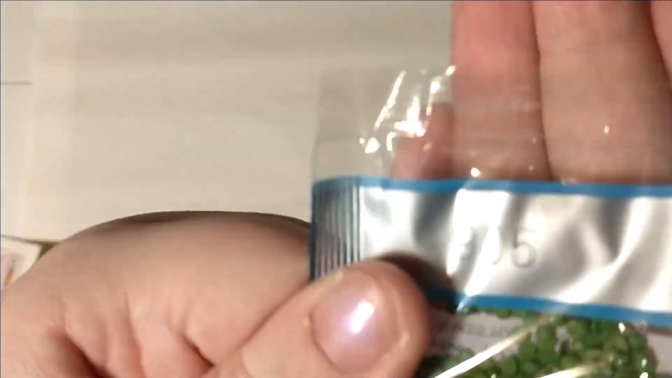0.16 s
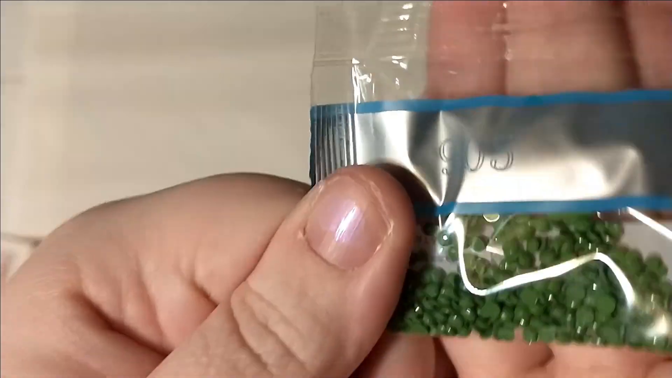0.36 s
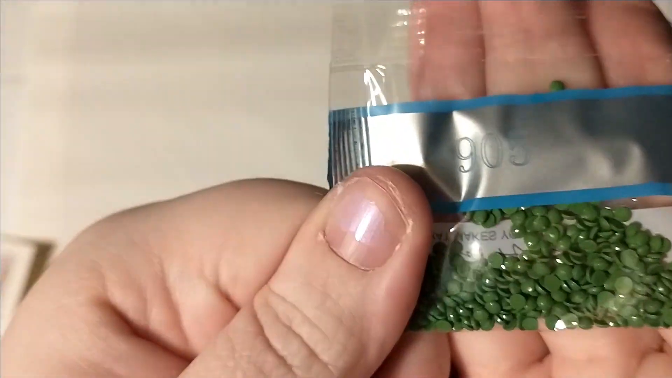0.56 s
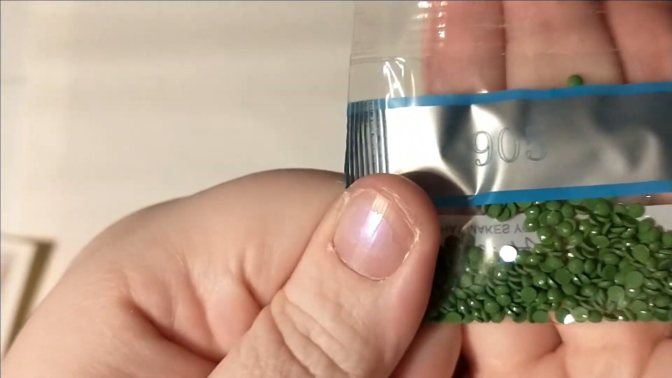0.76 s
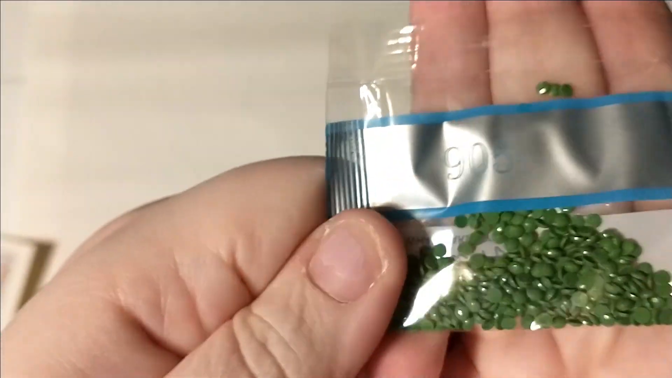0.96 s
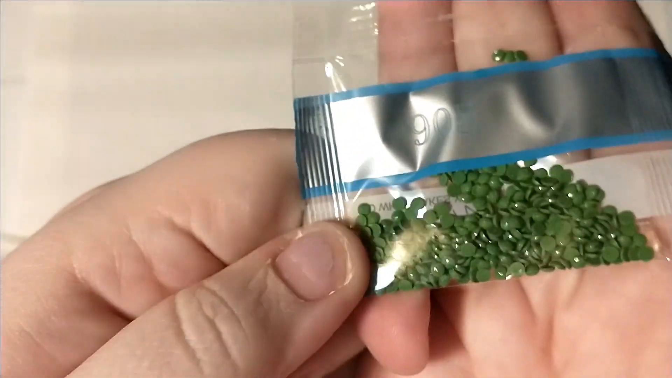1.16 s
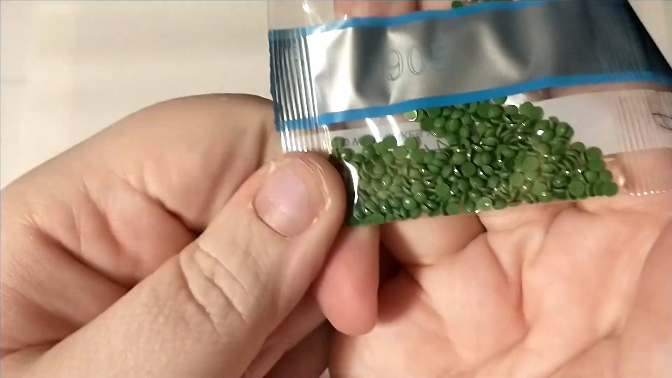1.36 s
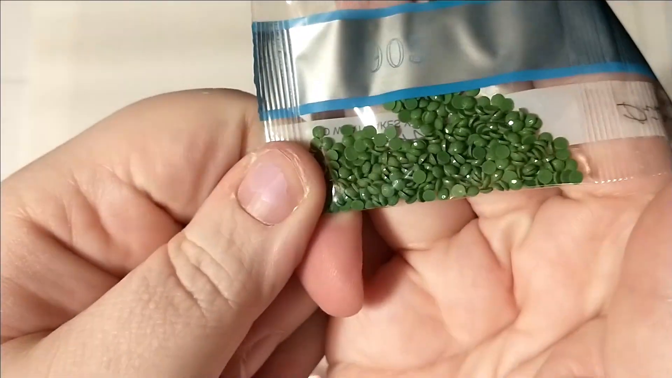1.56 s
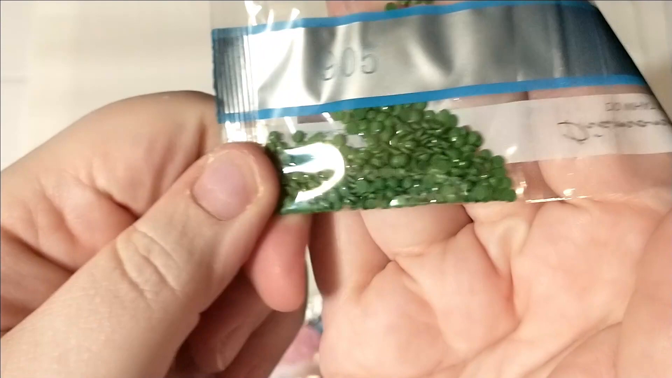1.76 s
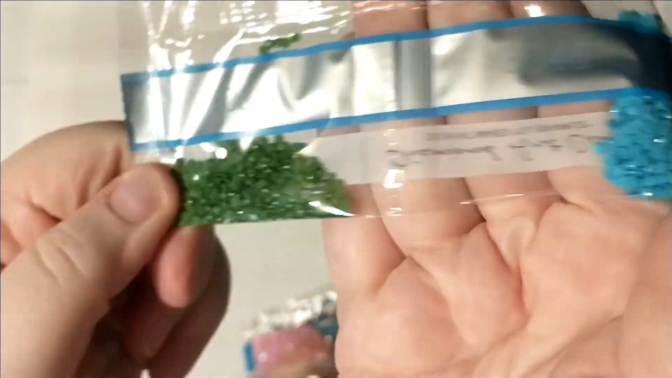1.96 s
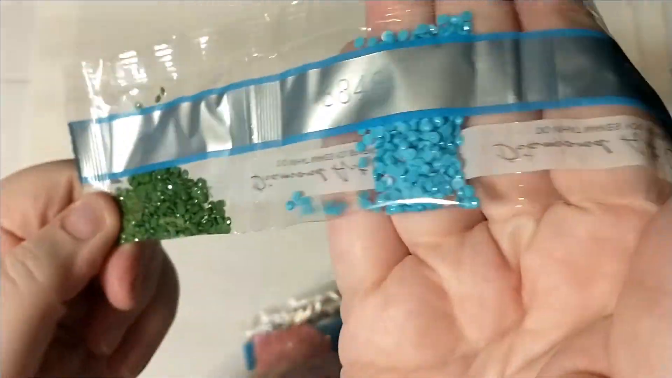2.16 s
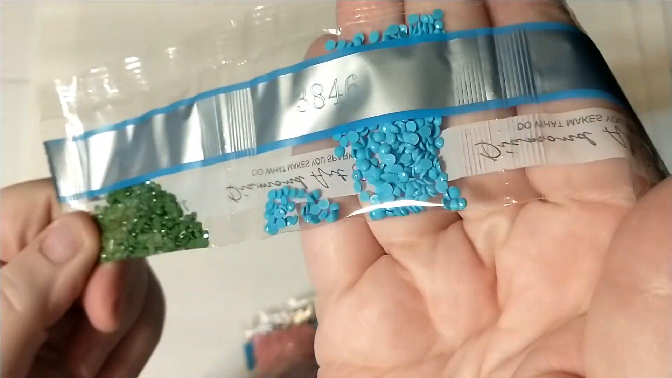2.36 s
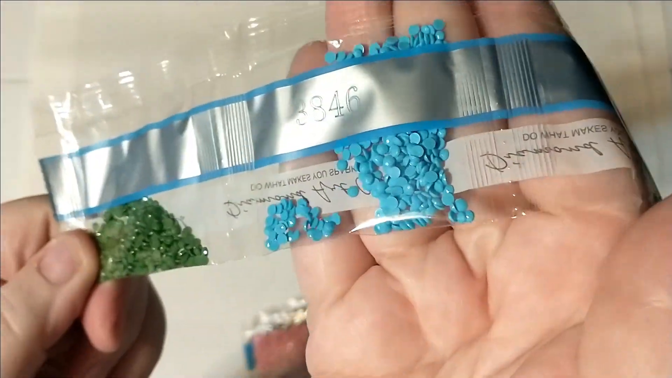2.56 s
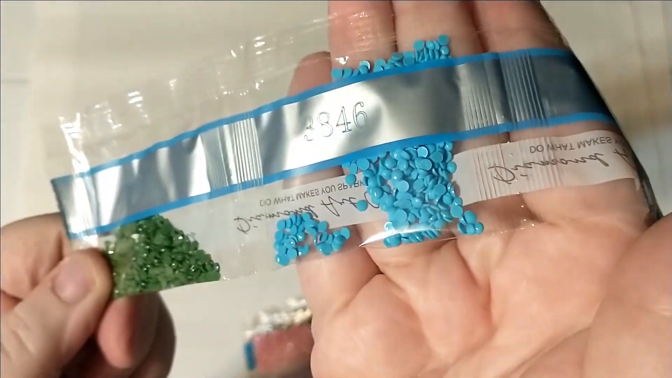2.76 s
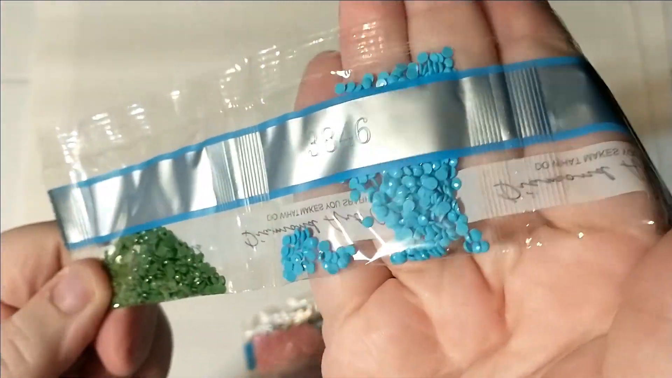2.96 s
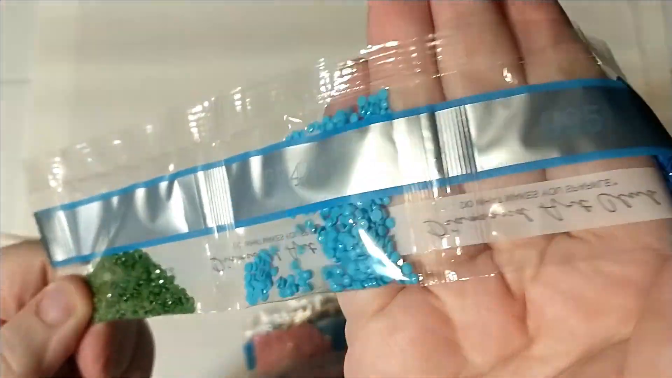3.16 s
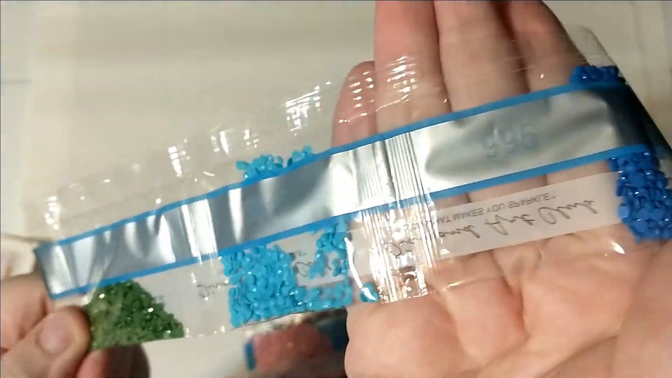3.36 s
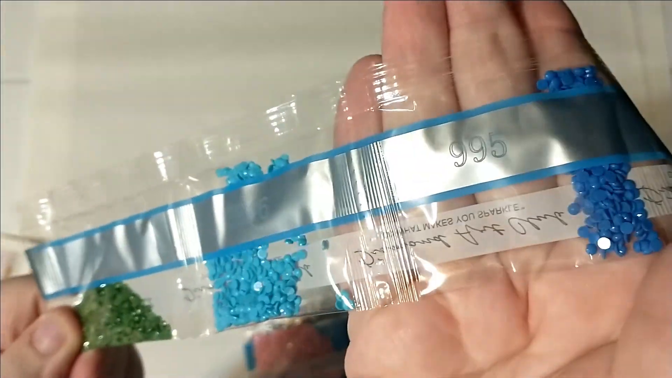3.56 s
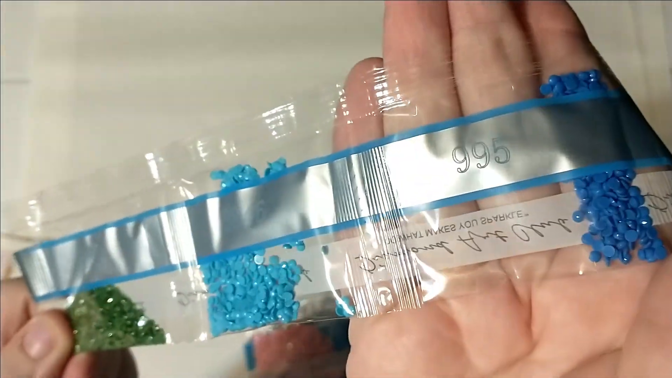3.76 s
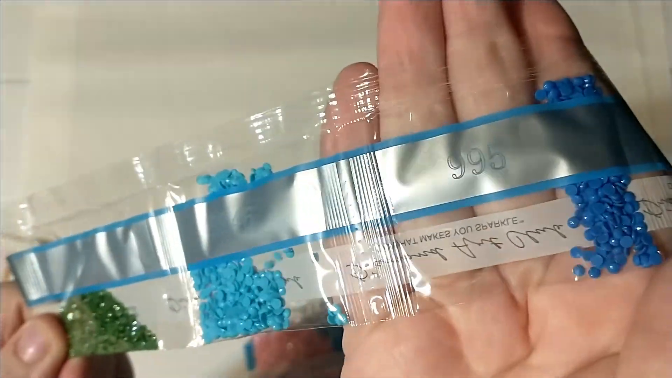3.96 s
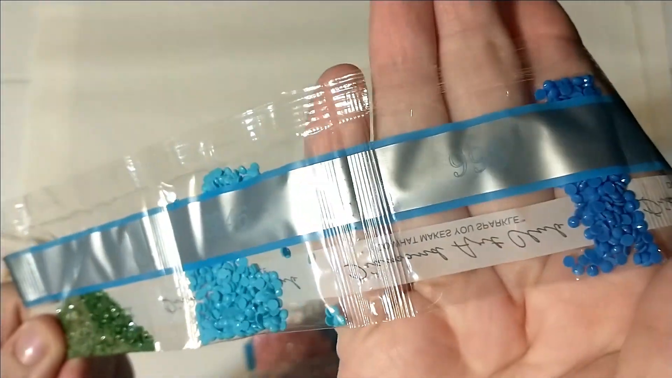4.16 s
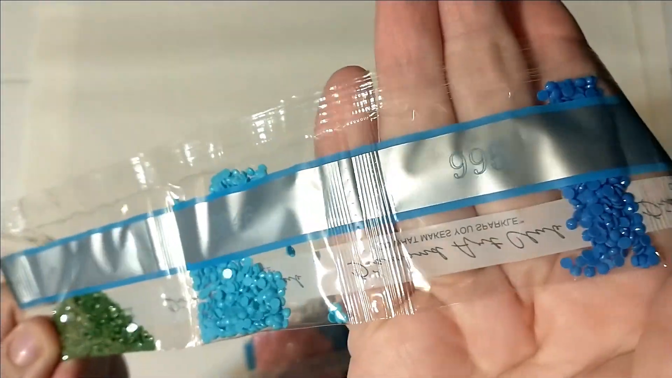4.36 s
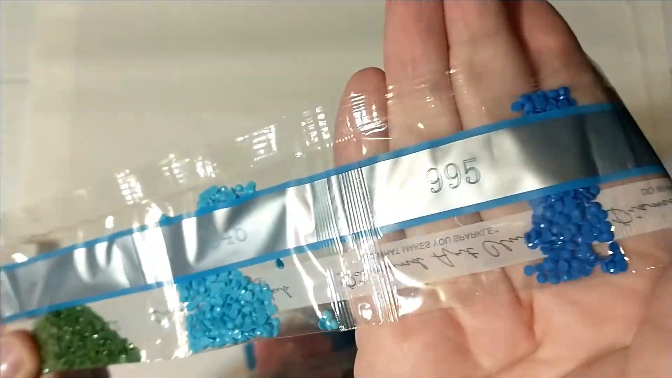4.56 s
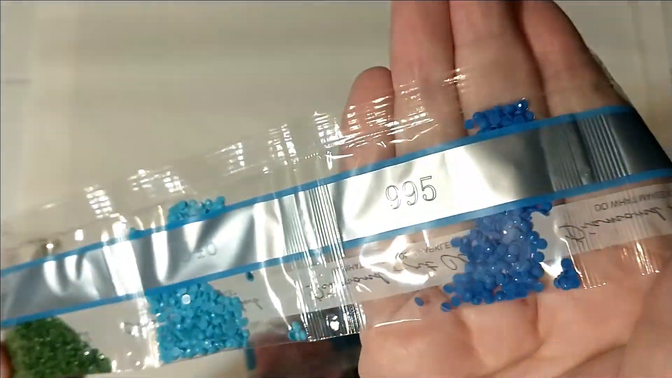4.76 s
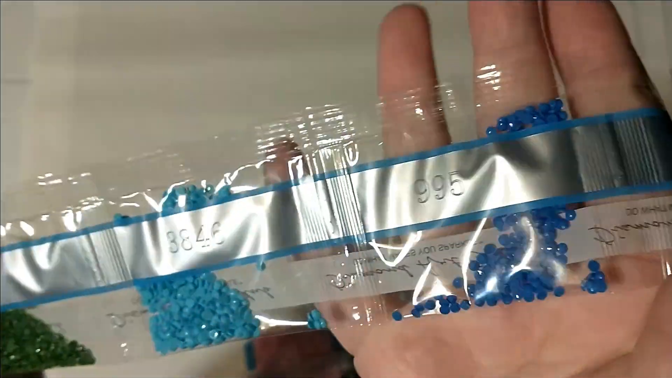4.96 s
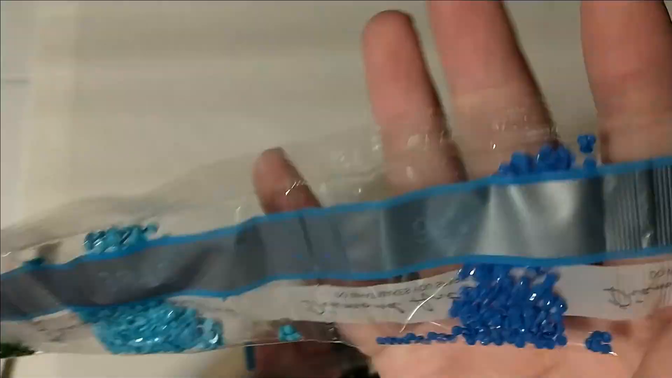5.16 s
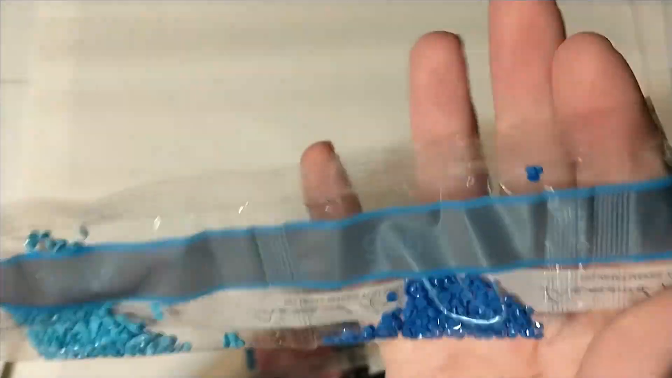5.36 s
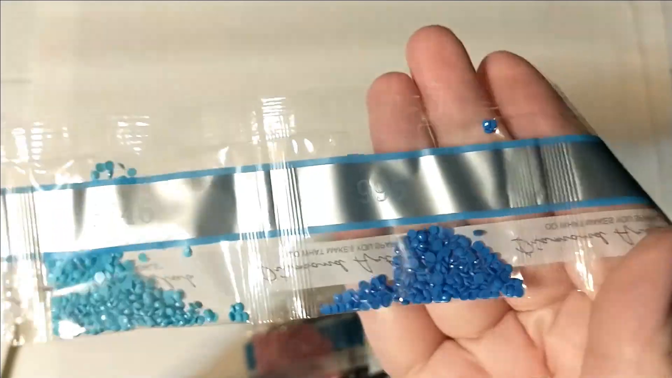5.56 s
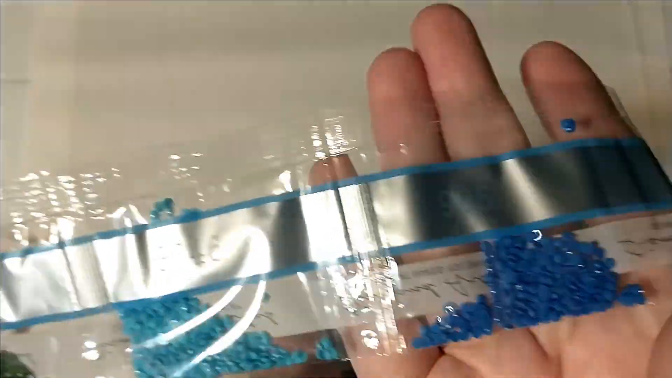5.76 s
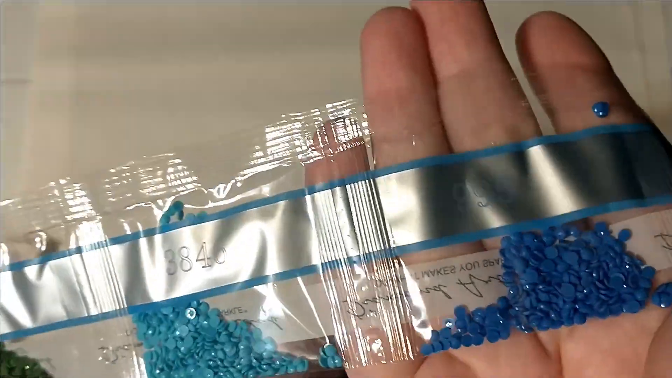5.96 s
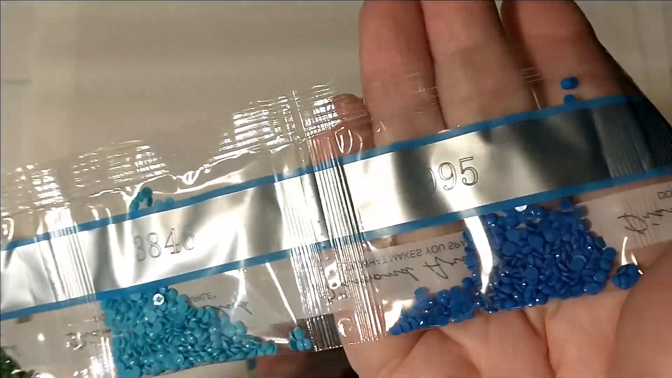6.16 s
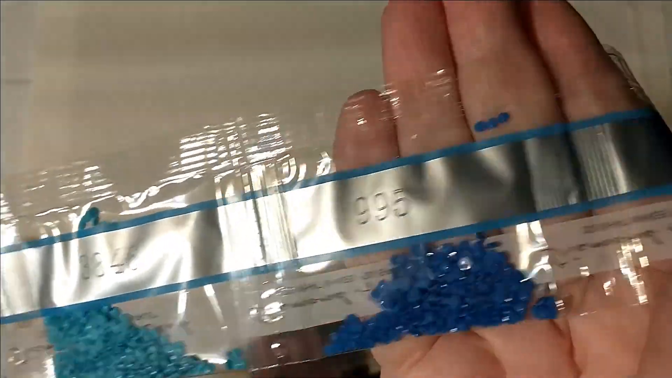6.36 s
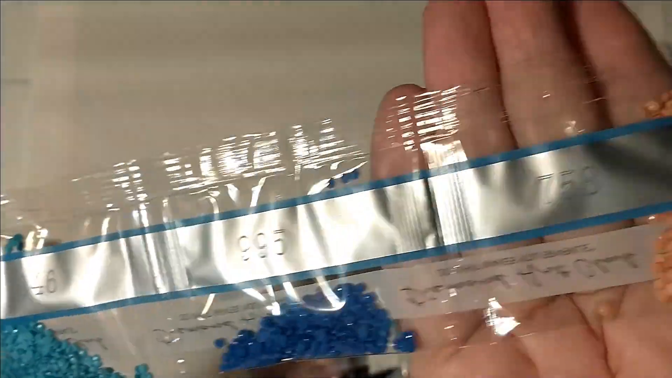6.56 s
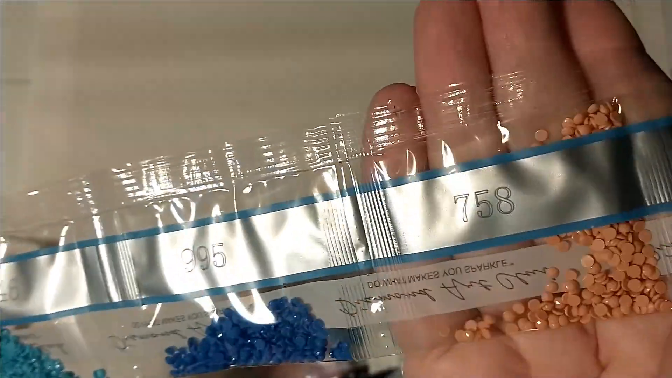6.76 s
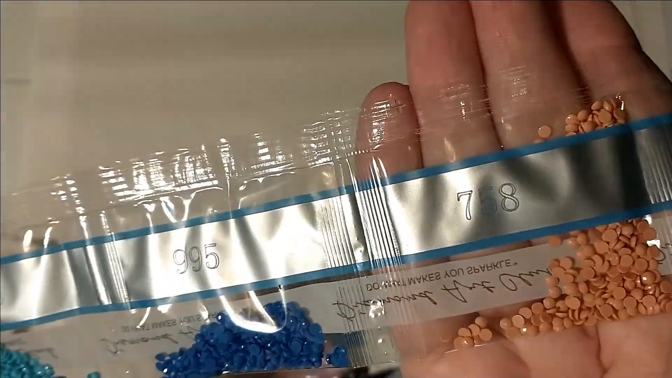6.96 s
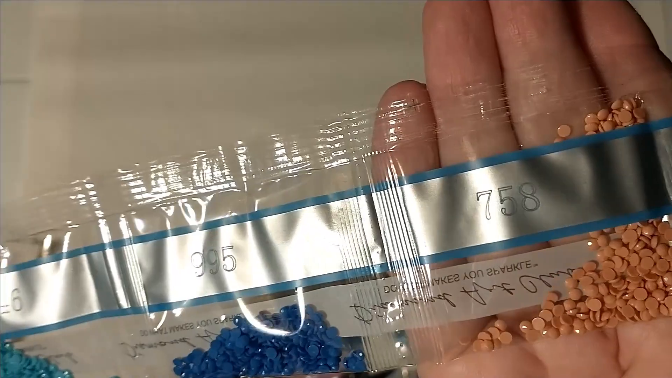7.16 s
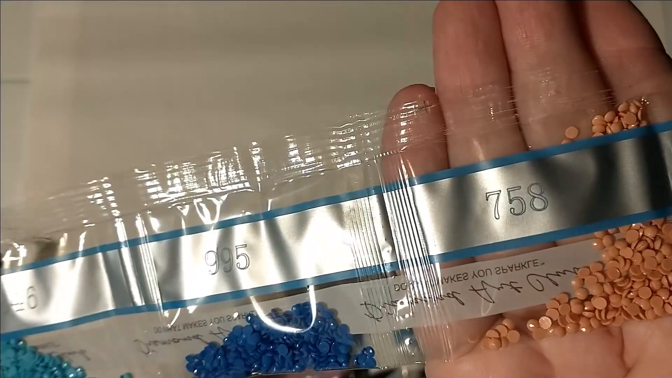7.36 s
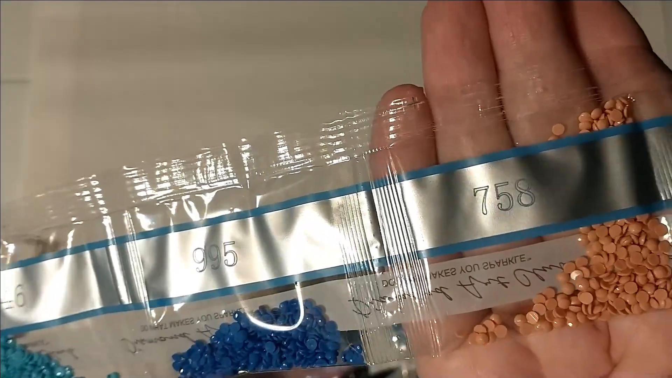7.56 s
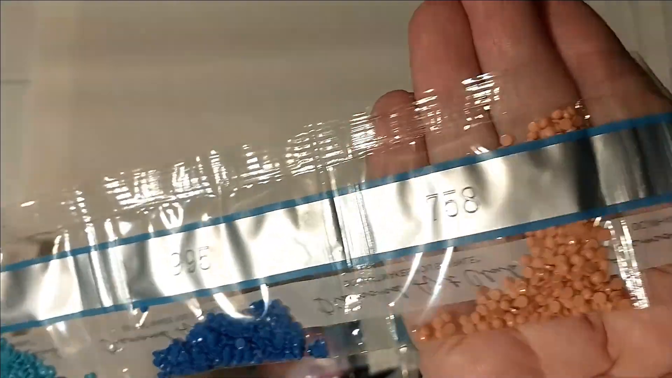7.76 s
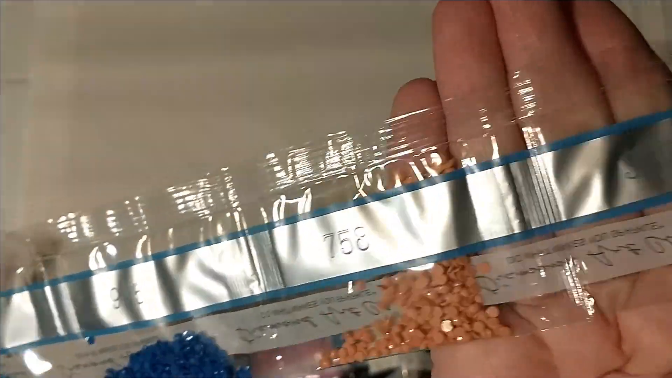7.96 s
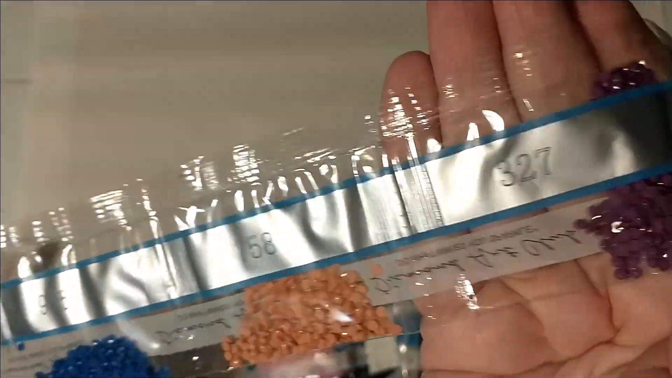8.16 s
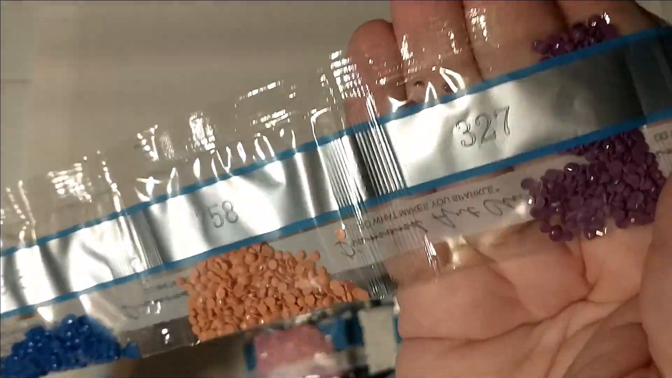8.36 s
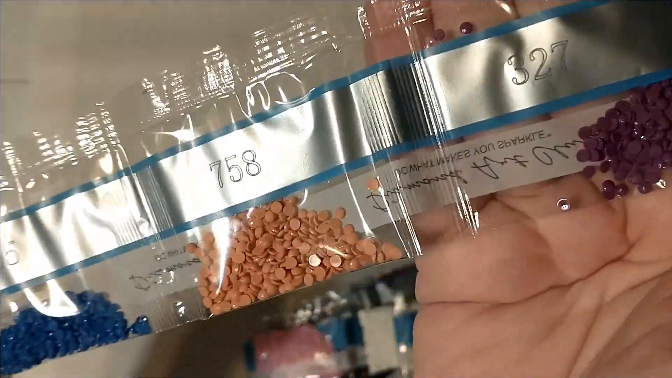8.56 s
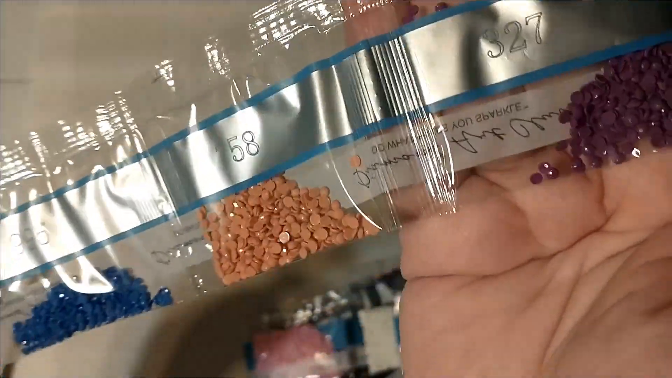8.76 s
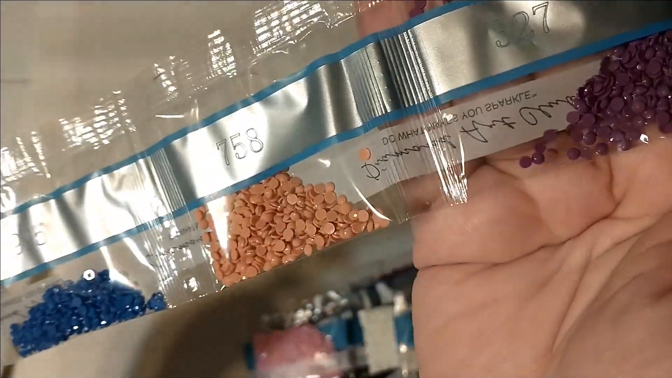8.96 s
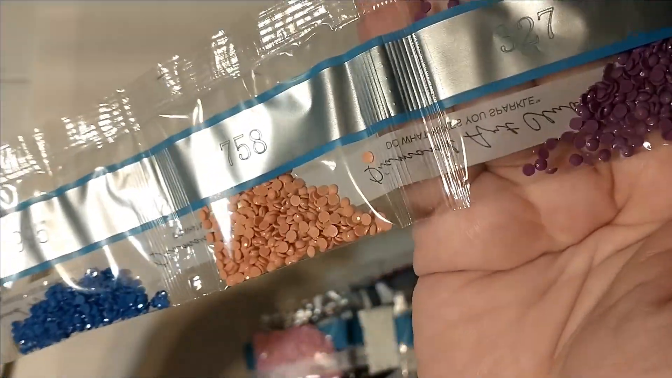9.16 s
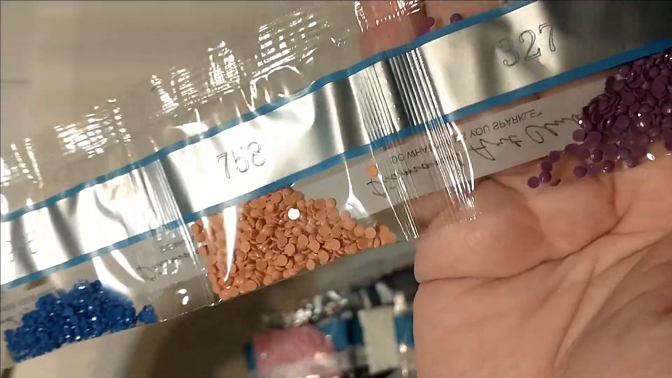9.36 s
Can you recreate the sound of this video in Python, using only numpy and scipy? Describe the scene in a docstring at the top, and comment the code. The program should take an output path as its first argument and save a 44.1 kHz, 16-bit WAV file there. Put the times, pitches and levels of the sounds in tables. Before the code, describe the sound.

Thin crisp plastic film crackles in irregular bursts as fingers pull and bend it: dense snapping at first, scattered ticks, then repeated firmer flurries separated by lulls. Tiny beads and film slide with a fine dry hiss, and skin brushes or bumps it softly. Close stereo pickup in a small quiet room with low air noise, a faint hum and a brief barely audible thin whine midway.

```python
"""Creases snap in a strip of small plastic bags of tiny beads, fed through the hands close to the microphone.
Each snap crosses the film as a bending wave, treble first, so it is heard as a very short falling chirp.
Each move of the hands swells and fades: film and beads slide over the palm, fine wrinkles crackle,
and a firm grip sets off lesser snaps at random. Brief scuffs and dull bumps join in.
The small room echoes densely and hums faintly; a thin whine comes and goes."""
import sys
import numpy as np
from scipy import signal
from scipy.fft import rfft, irfft, next_fast_len
from scipy.io import wavfile

SR = 44100
rng = np.random.default_rng(int(sys.argv[2]) if len(sys.argv) > 2 else 0)


def bounce(signal):
    """Save signal as a 16-bit WAV file at the path given by the first command-line argument."""
    frames = np.transpose(np.atleast_2d(signal))
    limited = np.clip(frames, -1, 1)
    pcm = np.round(limited * 32767).astype(np.int16)
    wavfile.write(sys.argv[1], SR, pcm)


N = 414981   # samples in the scene
GRAIN_SIZE, LEAD = 1024, 220   # samples in one snap; samples ahead of its centre


def from_db(db):
    """Turn dB into an amplitude factor."""
    return 10 ** (np.asarray(db) / 20)


def rms_one(x):
    """Scale x to an rms of 1."""
    return x / np.sqrt(np.mean(x ** 2) + 1e-20)


def seconds():
    """Time of every sample of the scene."""
    return np.arange(N) / SR


def at_hz(points, hz):
    """Read a (frequency, value) table on a log-frequency axis."""
    points = np.array(points)
    return np.interp(np.log(hz + 1), np.log(points[:, 0]), points[:, 1])


def filtered(x, response):
    """Pass x through a response given as a function of Hz."""
    size = next_fast_len(N + SR // 2)
    f = np.fft.rfftfreq(size, 1 / SR) + 1e-3
    return irfft(rfft(x, size) * response(f), size)[..., :N]


def resonance(f, hz, q):
    """Complex response of one resonance, 1 on top."""
    return 1 / (1 + 1j * q * (f / hz - hz / f))


def add(track, grain, s):
    """Lay a stereo grain into a track with its centre at s seconds."""
    start = int(s * SR) - LEAD
    a, b = max(start, 0), min(start + GRAIN_SIZE, N)
    track[:, a:b] += grain[:, a - start:b - start]


# colour of the still air in the room: (frequency [Hz], relative density [dB per Hz])
AIR_COLOUR = [(15, -45), (25, -9.5), (49, -18.5), (108, -1.5), (175, -7.5), (317, -9), (384, -12),
              (560, -16.5), (624, -26.5), (3620, -24.5), (9320, -34.5), (10100, -33), (16000, -42)]
# left-right likeness of that air: (frequency [Hz], coherence [0 to 1])
AIR_COHERENCE = [(30, 0.42), (100, 0.77), (500, 0.58), (2000, .25), (8000, .05)]
# hum tones in the room: (frequency [Hz], rms level [dB])
HUM_TONES = [(121, -73), (301, -74.5), (328, -76)]
AIR_DB = -63   # rms of the air without the hum


def air():
    """Quiet room noise, more alike at both ports in the bass, with a hum whose phase wavers slightly."""
    def shape(sign):
        return lambda f: (from_db(at_hz(AIR_COLOUR, f))
                          * np.sqrt(1 + sign * np.clip(at_hz(AIR_COHERENCE, f), 0, 1)))
    mid = filtered(rng.standard_normal(N), shape(1))
    side = filtered(rng.standard_normal(N), shape(-1))
    hum = 0
    for hz, db in HUM_TONES:
        waver = 0.022 * np.cumsum(rng.standard_normal(N))   # radians
        hum = hum + from_db(db) * np.sqrt(2) * np.sin(2 * np.pi * hz * seconds() + waver)
    return from_db(AIR_DB) * rms_one(np.array([mid + side, mid - side])) + hum


# faint thin whine: (frequency [Hz], width [Hz], rms level before the fades [dB])
WHINE_LINES = [(1560, 121, -74), (6900, 460, -69), (10400, 1200, -74)]
WHINE_FROM_S, WHINE_TO_S = 3.6, 4.6


def whine():
    """A few narrow, breathy lines of filtered noise that fade in and out."""
    t = seconds()
    fade = np.clip(np.minimum(t - WHINE_FROM_S, WHINE_TO_S - t) * 10, 0, 1)   # over 0.1 s
    noise = rng.standard_normal((2, N))
    lines = 0
    for hz, width, db in WHINE_LINES:
        line = signal.lfilter(*signal.iirpeak(hz, hz / width, fs=SR), noise)
        lines = lines + from_db(db) * rms_one(line)
    return fade * lines


def shared(response, alike_hz=900):
    """Long waves reach both ports alike, short ones differently."""
    left, right = rfft(response)
    alike = 1 / (1 + (np.fft.rfftfreq(response.shape[1], 1 / SR) / alike_hz) ** 2)
    return irfft(np.array([left, alike * left + np.sqrt(1 - alike ** 2) * right]))


# room echo per band: (centre [Hz], relative level [dB], t60 of the late decay [s])
ROOM_BANDS = [(300, -12, 0.43), (1000, -12.5, 0.26), (3500, -9.5, 0.24), (6760, -9.5, 0.11),
              (14000, -10.5, 0.15)]


def room(x, build_s=0.011, early=0.57, early_s=0.021):
    """Dense echoes from desk and walls, dying band by band, different at each port."""
    t = np.arange(SR // 2) / SR
    f = np.fft.rfftfreq(len(t), 1 / SR)
    white = rfft(rng.standard_normal((2, len(t))))
    centres = np.log([hz for hz, db, t60 in ROOM_BANDS])
    build = 1 - np.exp(-(t / build_s) ** 2)
    early_boost = 1 + early * np.exp(-t / early_s)
    response = 0
    for share, (hz, db, t60) in zip(np.eye(len(ROOM_BANDS)), ROOM_BANDS):
        decay = build * from_db(-60 * t / t60) * early_boost
        band = irfft(white * np.interp(np.log(f + 1), centres, share), len(t))
        response = response + from_db(db) * band * decay / np.sqrt(np.sum(decay ** 2))
    sent = (x + x[::-1] / 2) / 1.39   # each side also feeds the other
    return signal.fftconvolve(sent, shared(response), axes=1)[:, :N]


# hollow of the cupped hand and the desk below: (frequency [Hz], width [Hz], boost of this tone alone [dB])
HOLLOW_TONES = [(654, 100, 5), (730, 37, 2), (1019, 40, 4)]


def hollow(x, trim_db=0.44):
    """Hand and desk lift a few low tones."""
    def response(f):
        return 1 + sum((from_db(db) - 1) * resonance(f, hz, hz / width) for hz, width, db in HOLLOW_TONES)
    return from_db(trim_db) * filtered(x, response)


# fingers bumping the strip against the palm: (time [s], level at the start of the decay [dB])
PALM_BUMPS = [(0.013, -50), (0.281, -39.5), (0.455, -55), (1.948, -50), (2.165, -42), (2.272, -52),
              (5.22, -56), (5.55, -61), (6.037, -48), (6.433, -48), (8.232, -43)]


def bumps(thud_hz=190, q=0.29, t60=0.16, onset_s=0.0017):
    """Soft flesh gives a short dull thud, alike at both ports."""
    t = seconds()
    push = sum(from_db(db - 60 * np.maximum(t - s, 0) / t60) * np.clip((t - s) / onset_s, 0, 1)
               for s, db in PALM_BUMPS)
    return push * rms_one(filtered(rng.standard_normal(N), lambda f: resonance(f, thud_hz, q) ** 2))


# film scuffing briefly over skin: (time of the middle [s], half length to 1/e [s], peak level [dB])
SKIN_SCUFFS = [(0.313, 0.053, -27), (2.653, 0.037, -50.5), (5.378, 0.021, -29.5), (7.434, 0.005, -33.5),
               (7.448, 0.013, -47)]


def scuffs(film_hz=4200, q=1.0, slips_per_s=3000):
    """Very dense slips ring the film for a moment."""
    t = seconds()
    stroke = sum(from_db(db) * np.exp(-((t - s) / half) ** 2) for s, half, db in SKIN_SCUFFS)
    slips = (rng.random(N) < slips_per_s / SR) * (1 + rng.standard_normal((2, N)))
    return stroke * rms_one(filtered(slips, lambda f: resonance(f, film_hz, q) * resonance(f, film_hz, q / 4)))


# moves of the hands, each swelling, holding and dying away, levels before the band trims of the rustle:
# (full strength at [s], rustle [dB], rise [s], hold [s], fall [s],
#  low body re rustle [dB], top sizzle re rustle [dB])
HAND_MOVES = [(0, -20.5, .05, 0.043, 0.12, -13, -2.5), (0.099, -32, 0.042, 0.37, 0.21, -13.5, -3.5),
              (.97, -53.5, .06, 0.15, .35, -21, -7), (1.4, -54.5, .3, 0.014, .22, -13, -5),
              (1.98, -35.5, .1, .14, 0.15, -16, 0), (2.18, -24.5, .08, 0.072, 0.11, -14.5, 0),
              (2.38, -46, 0.13, 0.058, 0.28, -13, .5), (3.351, -35.5, .24, .26, .085, -14.5, -2),
              (3.75, -59.5, 0.11, 0.31, .2, -5.5, -6.5), (4.158, -56.5, 0.086, 0.13, 0.031, -16, -5),
              (4.583, -51, .08, 0.51, 0.24, -9, -5.5), (4.78, -38.5, .06, .06, .2, -12.5, -1.5),
              (5.101, -45, .2, .12, .2, -17, -6), (5.35, -32.5, .16, 0.055, 0.31, -13.5, -2.5),
              (5.53, -37, 0.16, .18, 0.19, -10.5, -2), (5.878, -38.5, .08, 0.045, 0.087, -10.5, -3),
              (6.032, -40, 0.057, 0.011, .16, -9, -24), (6.41, -41, .26, 0.36, .1, -10.5, -2),
              (6.701, -29.5, .09, .11, 0.16, -13.5, 0), (7.027, -51, .2, 0.12, 0.33, -16, -17.5),
              (7.979, -36, 0.18, 0.19, 0.11, -14, -8), (8.249, -27.5, .15, 0.019, 0.17, -15.5, -2.5),
              (8.501, -55.5, 0.12, 0.41, 0.36, -7, -4.5), (9.047, -46, .06, .01, 0.19, -20, -11)]
SWELL_DB = 20   # rise and fall are the times for this change of level, never under 0.01 s
# the strip lying still in the hands: rustle; body and sizzle re rustle
REST_DB, REST_BODY_DB, REST_SIZZLE_DB = -75, -0.5, -3.5


def handling():
    """Levels in dB of the rustle, its low body and its top sizzle: all moves of the hands added up."""
    t = np.arange(0, N, 64) / SR   # every 64 samples is fine enough

    def colour(body, sizzle):
        return from_db([[0], [body], [sizzle]])
    power = (from_db(REST_DB) * colour(REST_BODY_DB, REST_SIZZLE_DB)) ** 2
    for s, db, rise, hold, fall, body, sizzle in HAND_MOVES:
        before = np.maximum(s - t, 0) / max(rise, .01)
        after = np.maximum(t - s - hold, 0) / max(fall, .01)
        power = power + (from_db(db - SWELL_DB * (before + after)) * colour(body, sizzle)) ** 2
    return [np.interp(seconds(), t, 10 * np.log10(p)) for p in power]


def unit(h):
    """Scale a spectrum to a mean power of 1."""
    return h / np.sqrt(np.mean(abs(h) ** 2, axis=-1, keepdims=True))


def chirp(ring_hz, pop_db, crack_db, q=2.02, travel_s=.0022, edge_echo=0.4, fold_echo=0.27,
          crack_hz=9700, crack_q=1.2, pop_hz=1150, film_hz=5000):
    """One buckling crease at both microphone ports, centred on sample LEAD; its ring has energy 1."""
    f = np.fft.rfftfreq(GRAIN_SIZE, 1 / SR) + 1e-3

    def late(s):
        return np.exp(-2j * np.pi * f * s)

    def bend(s):   # bending waves: the travel time is s at film_hz and goes as 1 / sqrt(frequency)
        return np.exp(-4j * np.pi * s * np.sqrt(f * film_hz))
    # each crease lies at another distance, slightly different for each port
    travel = travel_s * rng.uniform(0.523, 1.3) * rng.uniform(0.9213, 1.0, (2, 1))
    # the wave comes back from the seams, differently towards each port
    seams = 1
    for _ in range(4):
        strength = edge_echo * rng.normal(size=(2, 1))
        seams = seams + strength * late(rng.uniform(.0001, .002, (2, 1))) * bend(travel / 10)
    # a nearby fold cuts broad notches beside the ring
    fold = 1 + fold_echo * late(rng.integers(2, 4) / ring_hz)
    body = resonance(f, ring_hz, q) * resonance(f, film_hz, 0.37) / (1 + (f / 11500) ** 6)
    ring = unit(body * seams * fold)
    # the sharp first crack adds its treble in step with the ring
    crack = unit(abs(resonance(f, crack_hz, crack_q) ** 3 * seams) * np.exp(1j * np.angle(ring)))
    centring = late(-travel * np.sqrt(film_hz / ring_hz))
    film = (ring + from_db(crack_db) * crack) * bend(travel) * centring
    # the whole panel flips and pushes the air directly, ahead of the ring
    panel_hz = pop_hz * rng.uniform(0.88, 2.12)
    pop = unit(resonance(f, panel_hz, 0.48) ** 2 * (1 + (seams - 1) / 2)) * late(-0.00064)
    port_lag = rng.normal(2.1e-5, 1.8e-5) * np.array([[-1], [1]])   # seconds
    return irfft((film + from_db(pop_db) * pop) * late(LEAD / SR + port_lag))


def wrinkles(per_s, spread_db=6.5):
    """Tiny creases of random size and pitch, with an even mean level and a flat mean spectrum."""
    pitches = np.geomspace(2100, 9200, num=60)
    bank = np.array([chirp(hz, rng.normal(-30, 1), rng.normal(-8.0, 6.5)) for hz in pitches])
    out = np.zeros((2, N))
    for i in np.flatnonzero(rng.random(N) < per_s / SR):
        size = from_db(spread_db * min(rng.exponential(), 2.8)) / np.sqrt(per_s[i])
        add(out, size * rng.choice([-1, 1]) * bank[rng.integers(len(bank))], i / SR)
    mean = np.sqrt(np.mean(abs(rfft(bank)) ** 2, axis=(0, 1)))
    bank_f = np.fft.rfftfreq(GRAIN_SIZE, 1 / SR)
    return rms_one(filtered(out, lambda f: 1 / np.interp(f, bank_f, mean + mean.max() / 100)))


# colour of the rustle before its three bands are levelled: (frequency [Hz], relative density [dB per Hz])
RUSTLE_COLOUR = [(100, -10.5), (300, -8), (480, -9.5), (700, -7), (1400, -4.5), (2200, -4), (4000, 1.5),
                 (5500, -5.5), (7200, 1), (9500, -2.5), (13000, -8), (16000, -15)]
USUAL_DB = -35.5   # rustle of an ordinary pull


def rustle(level, body, sizzle, busy_per_s=520, slide_db=-4.0, slide_fades=0.073,
           middle_db=-1.14, sizzle_db=0.95):
    """Firmer handling makes more wrinkles; a light touch lets the fine hiss of sliding film and beads through."""
    per_s = np.clip(busy_per_s * from_db((level - USUAL_DB) / 2), 200, 2000)
    slide = rms_one(rng.standard_normal((2, N)) + 0.66 * rng.standard_normal(N))   # partly alike
    share = from_db(slide_db - slide_fades * (level - USUAL_DB))
    mixed = (wrinkles(per_s) + share * slide) / np.hypot(1, share)
    source = filtered(mixed, lambda f: from_db(at_hz(RUSTLE_COLOUR, f)))

    def part(edges, kind):
        return rms_one(signal.sosfilt(signal.butter(4, edges, kind, fs=SR, output="sos"), source))
    low, middle, top = part(1800, "low"), part([1800, 6000], "band"), part(6000, "high")
    return from_db(body) * low + from_db(level + middle_db) * middle + from_db(sizzle + sizzle_db) * top


def small_snaps(level, body, per_s=15, over_db=13.5, scatter_db=0.4, top_db=-25, ring_hz=5600, octaves=0.33,
                pop_db=1.0, firm_db=-43, knee_db=3.0):
    """Under a firm grip lesser creases give way at random, following the handling; rows as in CREASE_SNAPS."""
    rate = per_s / (1 + np.exp((firm_db - level) / knee_db))
    rows = []
    for i in np.flatnonzero(rng.random(N) < rate / SR):
        a, b = rng.standard_normal(2)
        db = min(level[i] + over_db, top_db) + scatter_db * a
        rows.append((i / SR, db, ring_hz * 2 ** (octaves * b), body[i] - level[i] + pop_db))
    return rows


# creases whose snap stands out, levels before the trims in snaps():
# (time [s], level [dB], ring of the film [Hz], low pop re ring [dB])
CREASE_SNAPS = [(0.015, -13, 6400, -22), (0.0383, -14, 7140, -4.5), (.0538, -22, 5600, -0.5),
                (.067, -27, 5330, -18), (0.1012, -13, 6700, -22), (0.2218, -23, 5600, -19),
                (0.2648, -21.5, 3840, -26), (0.289, -17, 6100, -16.5), (0.4565, -14.5, 6200, -12),
                (0.4725, -18, 2700, -28), (0.4944, -21, 4500, -27.5), (0.5521, -15, 5550, -14.5),
                (0.6141, -26, 7090, -8.5), (0.9515, -38, 3260, -20), (.986, -34.5, 4360, -14),
                (1.0335, -24.5, 3670, -41), (1.087, -34, 4310, -25), (1.093, -26, 4200, -14),
                (1.1385, -21, 4630, -13.5), (1.3538, -25, 3580, -16), (1.3835, -16, 3670, -18.5),
                (1.4129, -31.5, 5900, -35), (1.5315, -36.5, 3770, -32), (1.6228, -30, 3680, -35),
                (1.6784, -31, 3290, -19), (1.8305, -40, 5100, -10.5), (1.9178, -31.5, 4600, -8.5),
                (1.9357, -22.5, 4200, -26), (1.9559, -22.5, 3594, -3), (2.0143, -17, 5900, -28),
                (2.0432, -14, 6600, -15.5), (2.095, -15, 5040, -17), (2.1483, -18, 6800, -10.5),
                (2.1842, -14.5, 4627, -10), (2.235, -18.5, 5700, -2), (2.2579, -30, 6860, -7),
                (2.2855, -10.5, 6460, -10), (2.524, -36, 4500, -11), (2.853, -42.5, 3467, -4.5),
                (3.09, -34.5, 4700, -12.5), (3.1544, -25, 4940, -15.5), (3.2105, -23, 7550, -26),
                (3.227, -15.5, 5860, -24), (3.3052, -23, 4795, -4.5), (3.3128, -22.5, 6000, -13),
                (3.3505, -13, 8000, -15.5), (3.364, -26.5, 5960, -7), (3.4007, -16.5, 7270, -12),
                (3.4417, -20, 4650, -46.5), (3.5193, -13, 6890, -17), (3.5628, -14, 4474, -16.5),
                (3.6853, -28, 3380, -17), (3.8696, -30.5, 7040, -16), (4.1087, -28, 6600, -12),
                (4.3607, -39.5, 4610, -13), (4.5714, -28.5, 3200, -17), (4.5903, -28.5, 3985, -7),
                (4.6036, -34.5, 5116, -16), (4.672, -29, 4060, -14), (4.76, -25, 4300, -12),
                (4.8183, -17.5, 5422, -9.5), (4.851, -23.5, 6400, -34), (5.0885, -22.5, 5450, -10),
                (5.0938, -22, 3730, -12), (5.1034, -21.5, 4860, -20), (5.1697, -23.5, 4090, -24),
                (5.2171, -11, 5170, -15), (5.2302, -15.5, 4530, -9.5), (5.5573, -26.5, 3640, 2.5),
                (5.5633, -20.5, 2125, -22), (5.5809, -20.5, 5510, -5.5), (5.638, -33, 4943, -1.5),
                (5.7301, -20.5, 7620, -17), (5.7598, -26.5, 9100, -8), (5.827, -25, 4560, -0.5),
                (5.85, -21.5, 6490, -21), (5.88, -20.5, 4654, -17), (5.886, -23, 7500, -15),
                (5.9103, -22.5, 7160, -9.5), (6.0053, -24.5, 4400, -7), (6.0269, -17.5, 7530, -27),
                (6.0489, -25.5, 6200, -5), (6.1353, -24.5, 6970, -18), (6.1508, -20, 4050, -15),
                (6.2485, -26.5, 4530, -4), (6.3101, -31, 5090, 3), (6.331, -16.5, 5306, -10),
                (6.3755, -26, 5620, -3), (6.4118, -17.5, 4200, -29.5), (6.4429, -11.5, 4770, -14),
                (6.4977, -22, 6510, -30.5), (6.5063, -23, 6320, -3.5), (6.5347, -19, 8664, -36),
                (6.5696, -18, 4997, -29.5), (6.615, -19, 6400, -35.5), (6.6547, -10.5, 5600, -17.5),
                (6.7021, -13.5, 6060, -14), (6.7597, -15, 5484, -25), (6.796, -16.5, 5380, -7.5),
                (6.8209, -16.5, 6580, -8), (7.3882, -32.5, 3450, -14), (7.405, -34.5, 3475, -16),
                (7.4472, -27.5, 5400, -29), (7.588, -52, 3910, -25), (7.6193, -46, 4160, -32),
                (7.643, -55, 3754, -25), (7.804, -21.5, 4790, -19), (7.8558, -25, 3660, -17),
                (7.8939, -24, 3962, -10), (7.9666, -18, 4560, -18.5), (8.0166, -21.5, 4910, -26),
                (8.0566, -17, 4733, -39), (8.0961, -19.5, 3400, -30), (8.1122, -12.5, 4353, -26),
                (8.1295, -16.5, 7245, -31.5), (8.1853, -14, 6660, -23.5), (8.2118, -15.5, 6400, -12),
                (8.263, -14, 3960, -38), (8.2728, -18, 7700, -18), (8.2991, -23.5, 4150, -9),
                (8.358, -14, 7730, -13), (8.4627, -27.5, 5555, -9), (8.5267, -33, 3550, -11),
                (8.6172, -20.5, 5480, -18.5), (8.7195, -23, 7130, -3.5), (8.7359, -23, 3977, -38),
                (8.8203, -16, 4140, -24), (9.0246, -36, 3990, -25), (9.0526, -23, 3460, -21),
                (9.3206, -37, 6340, -4)]
# where the strip is being bent, before pitch and scatter:
# (time [s], left over right [dB], top crack re ring [dB])
BENDING_PLACE = [(0, 0, -9), (1.2, 4, -15.5), (2.2, 2.5, -10.5), (3.4, 3, -16.5), (4.3, 3, -17.5),
                 (4.83, -2.5, -9.5), (5.15, 3, -18.5), (5.7, -4, -9), (6.15, 3, -9.5), (6.7, -2.5, -20),
                 (7.35, 2, -40), (7.85, 0, -26), (8.4, 2.5, -13.5), (9.2, 6.5, -9.5)]
PLACE_SCATTER_DB = -1   # random spread of the side; its sign does not matter
SNAP_SAMPLES = 200   # a snap's level is its rms over this many samples
# tighter creases ring higher and crack more sharply
CRACK_AT_HZ, CRACK_DB_PER_OCTAVE, CRACK_SCATTER_DB = 5330, 4.0, 2.5


def snaps(rows, level_db=-2.16, pop_db=-0.5, follow_db=-9.0, follow_s=.0028):
    """Each crease snaps with its own pitch near the place being bent and sets off a weaker neighbour."""
    out = np.zeros((2, N))
    when, side, sharpness = np.transpose(BENDING_PLACE)
    for s, db, hz, pop in rows:
        pan = np.interp(s, when, side) + PLACE_SCATTER_DB * rng.normal()
        tightness = CRACK_DB_PER_OCTAVE * np.log2(hz / CRACK_AT_HZ)
        crack = np.interp(s, when, sharpness) + tightness + CRACK_SCATTER_DB * rng.normal()
        sides = rms_one(from_db(pan / 2 * np.array([[1], [-1]])))
        gain = from_db(db + level_db) * np.sqrt(SNAP_SAMPLES) * sides
        add(out, gain * chirp(hz, pop + pop_db, crack), s)
        neighbour = chirp(hz * 2 ** rng.uniform(-0.49, 0.21), pop + pop_db, crack)
        add(out, gain * from_db(follow_db) * neighbour, s + follow_s * rng.uniform(0.495, 2))
    return out


def scene(lean_db=0.37):
    """Hand moves drive rustle and lesser snaps; hand hollow and room colour them, bumps skip the hollow."""
    level, body, sizzle = handling()
    creases = snaps(CREASE_SNAPS) + snaps(small_snaps(level, body))
    lean = from_db(lean_db * np.array([[1], [-1]]))   # the rustle sits slightly to the left
    bags = hollow(creases + scuffs() + rustle(level, body, sizzle) * lean) + bumps()
    return bags + room(bags) + air() + whine()


def record(dry):
    """Peaks beyond 0.92 are clipped, then the top is cut steeply at 16 kHz."""
    steep = signal.ellip(10, .2, 80, 16000, fs=SR, output="sos")
    return signal.sosfilt(steep, np.clip(dry, -.92, .92))


dry = scene()
out = record(dry)
bounce(out)
```